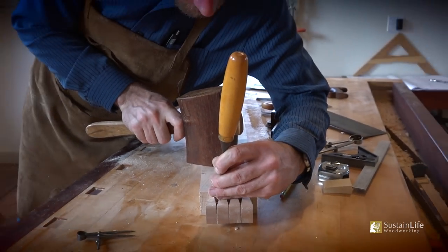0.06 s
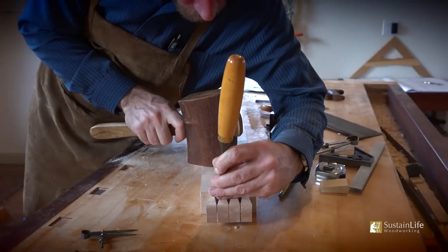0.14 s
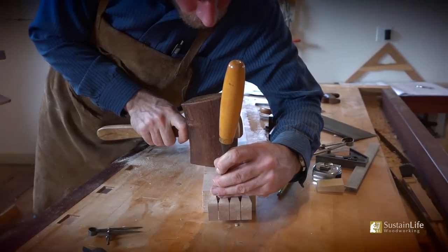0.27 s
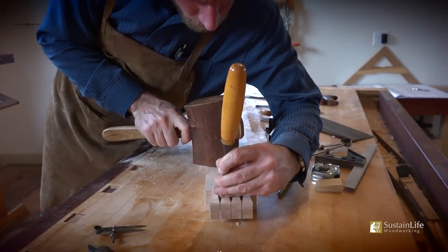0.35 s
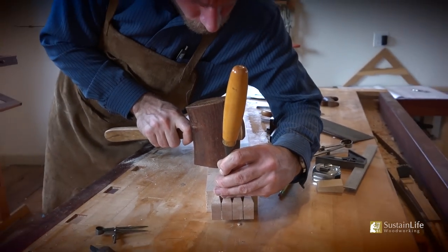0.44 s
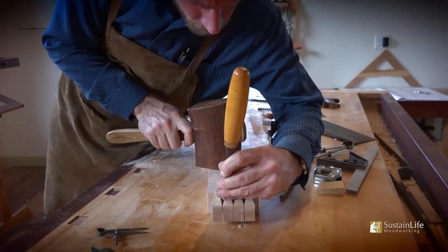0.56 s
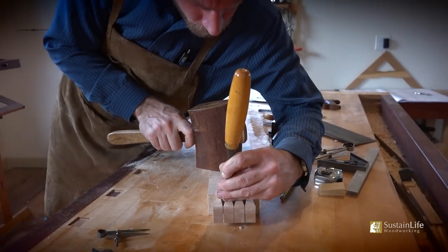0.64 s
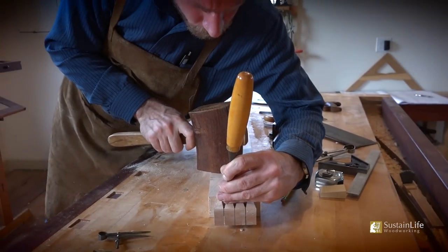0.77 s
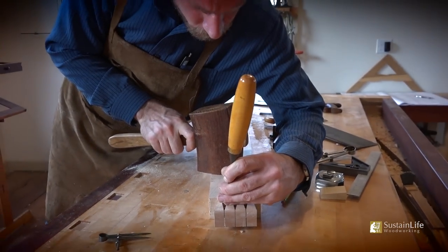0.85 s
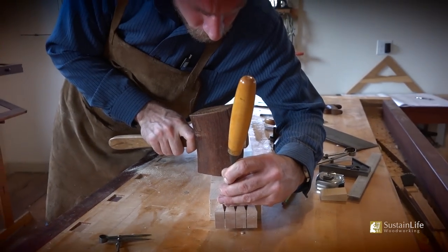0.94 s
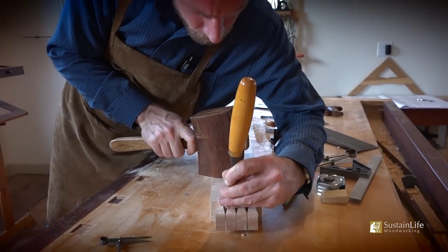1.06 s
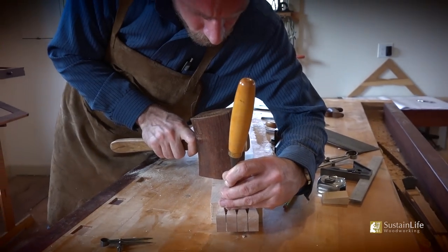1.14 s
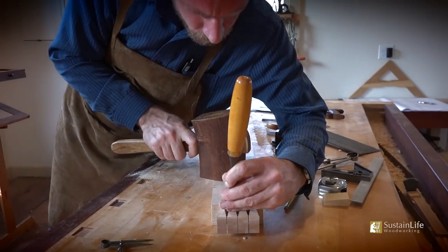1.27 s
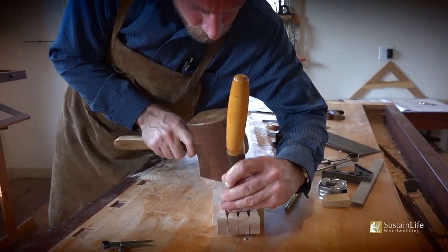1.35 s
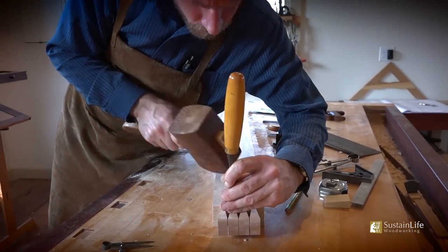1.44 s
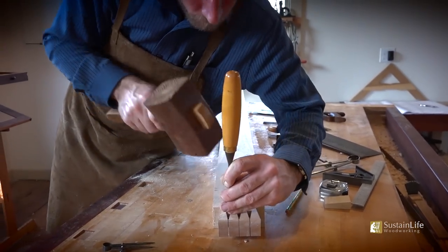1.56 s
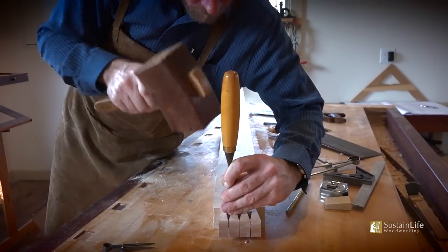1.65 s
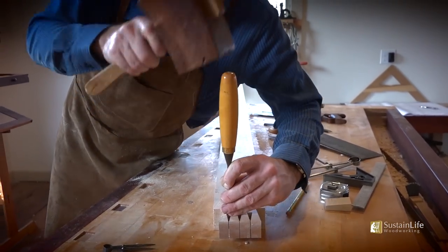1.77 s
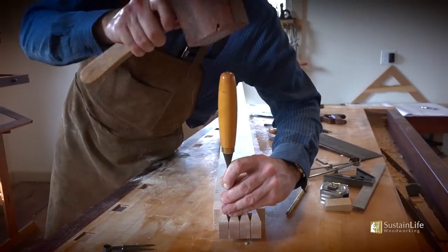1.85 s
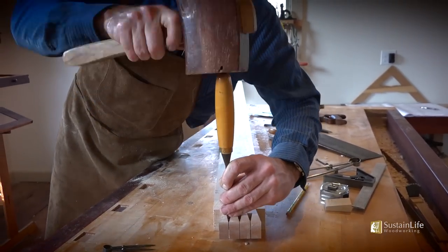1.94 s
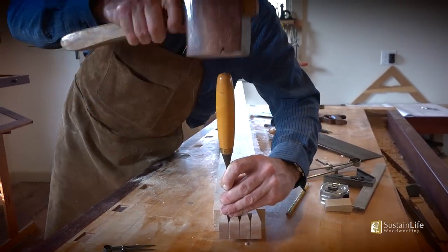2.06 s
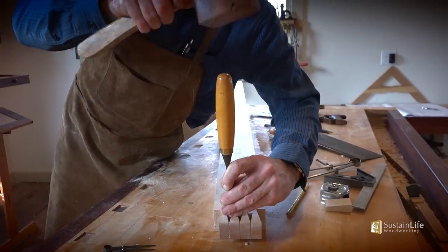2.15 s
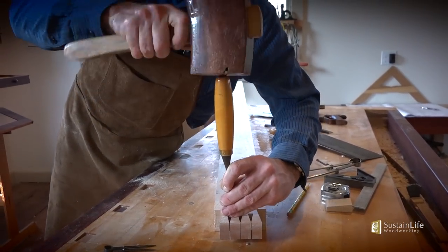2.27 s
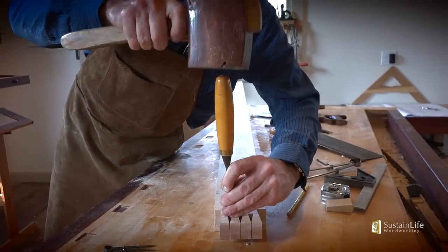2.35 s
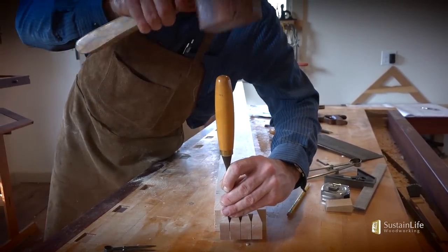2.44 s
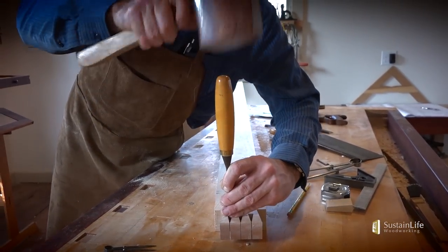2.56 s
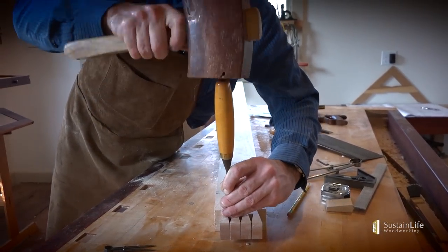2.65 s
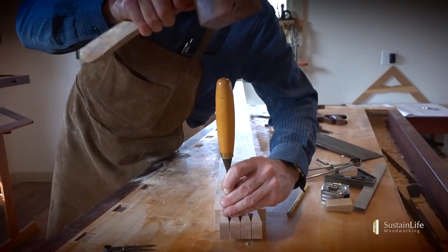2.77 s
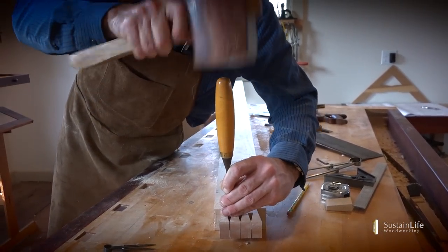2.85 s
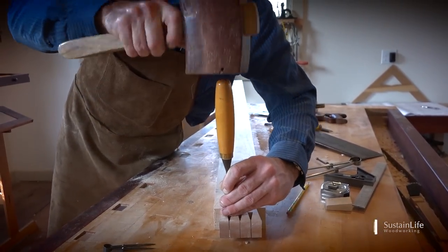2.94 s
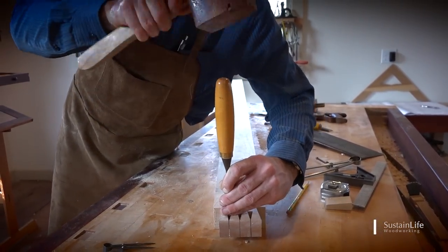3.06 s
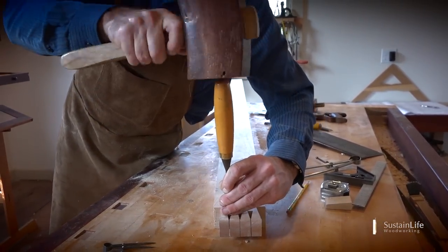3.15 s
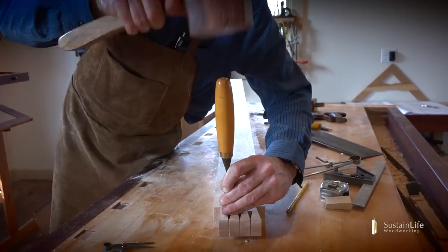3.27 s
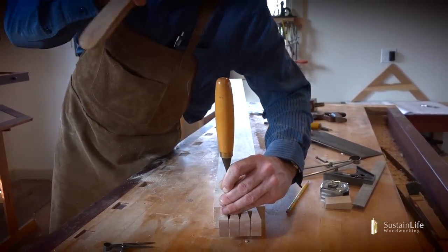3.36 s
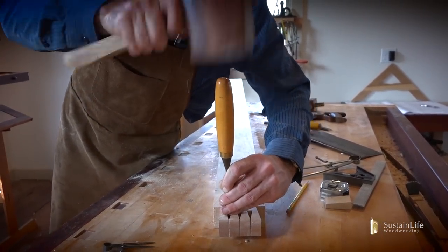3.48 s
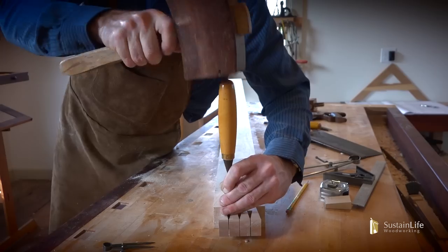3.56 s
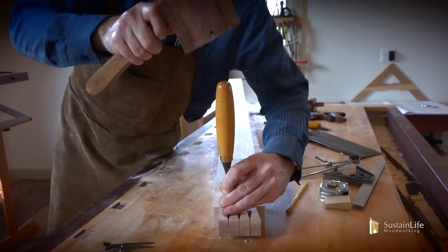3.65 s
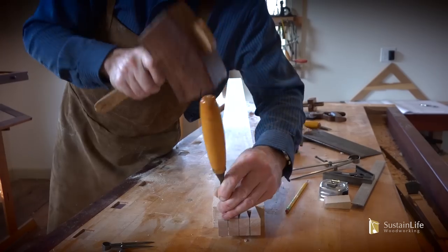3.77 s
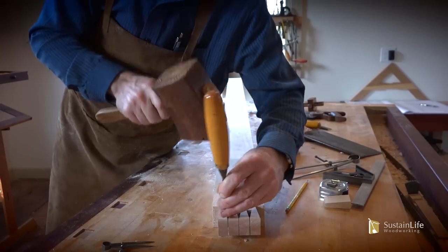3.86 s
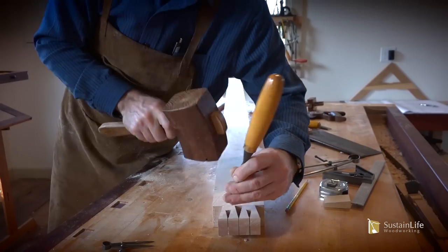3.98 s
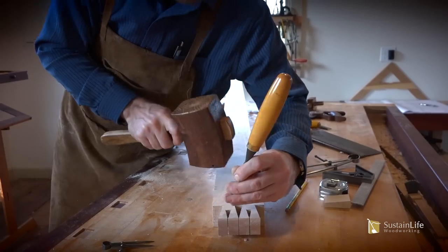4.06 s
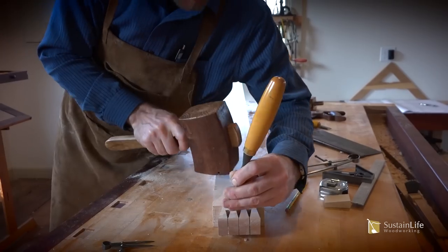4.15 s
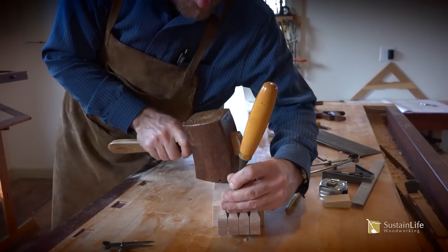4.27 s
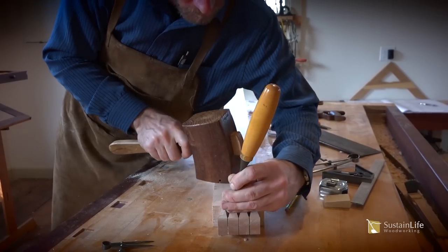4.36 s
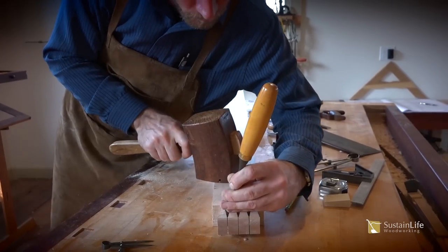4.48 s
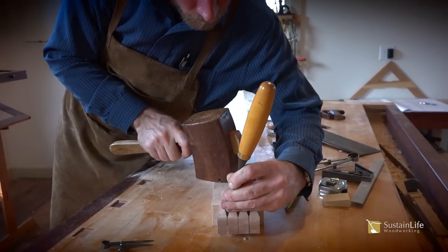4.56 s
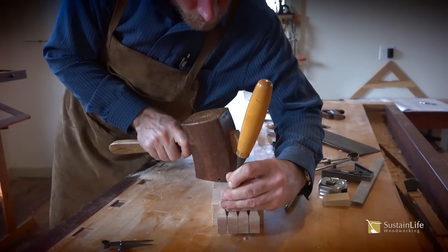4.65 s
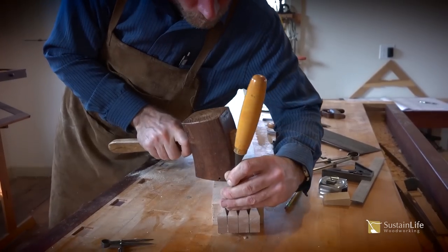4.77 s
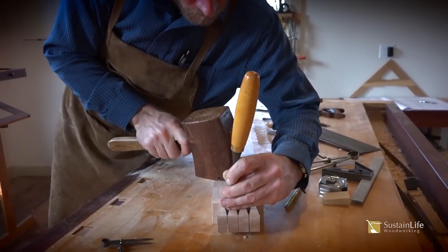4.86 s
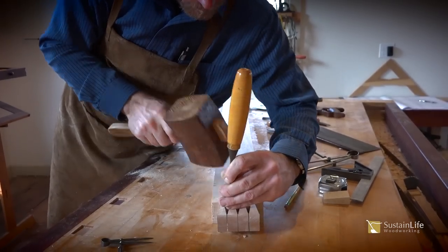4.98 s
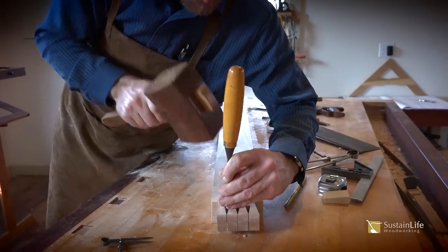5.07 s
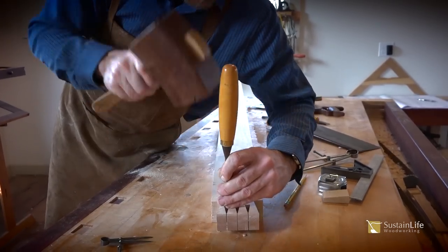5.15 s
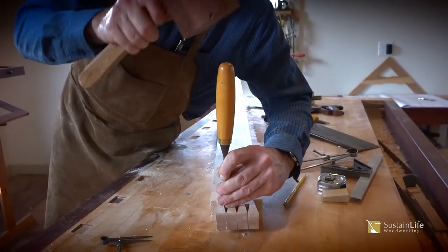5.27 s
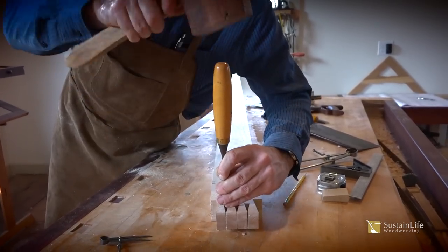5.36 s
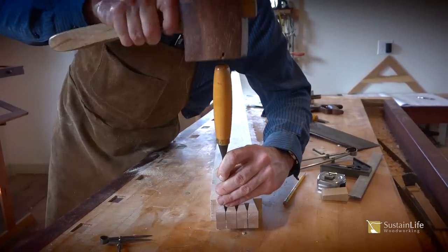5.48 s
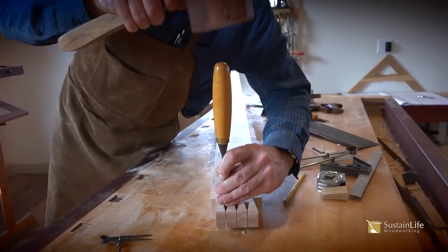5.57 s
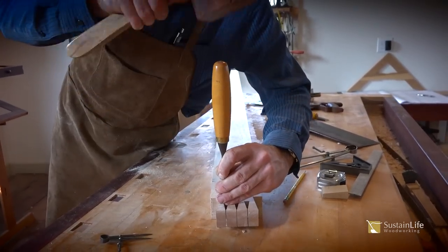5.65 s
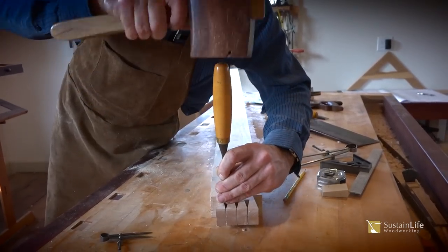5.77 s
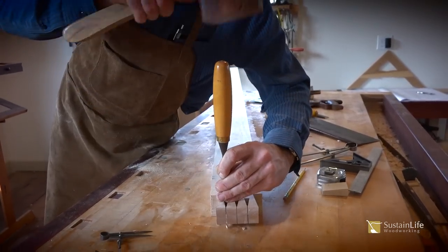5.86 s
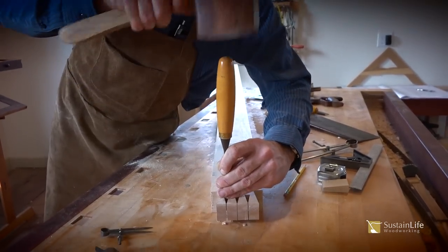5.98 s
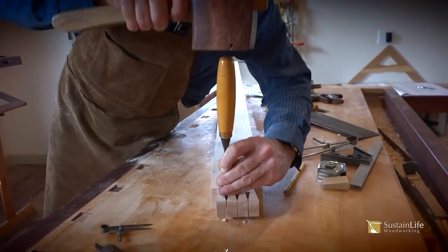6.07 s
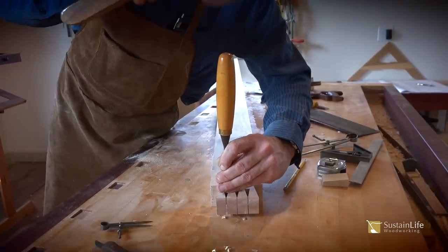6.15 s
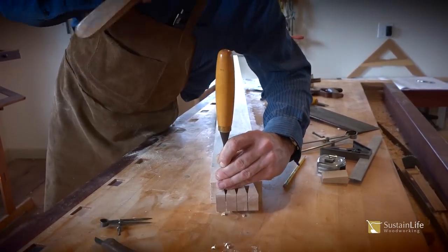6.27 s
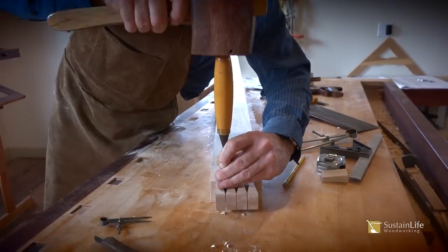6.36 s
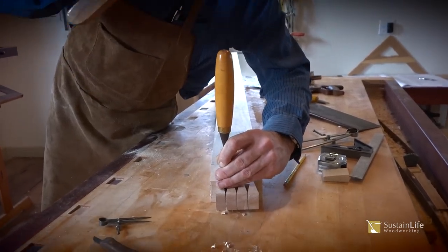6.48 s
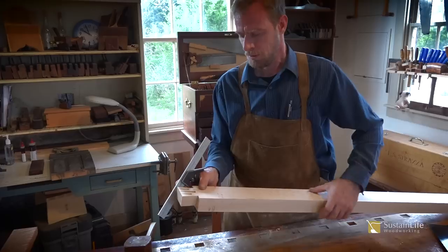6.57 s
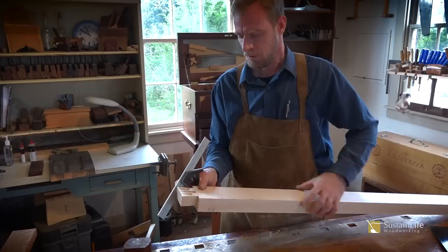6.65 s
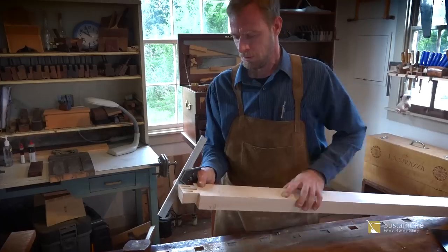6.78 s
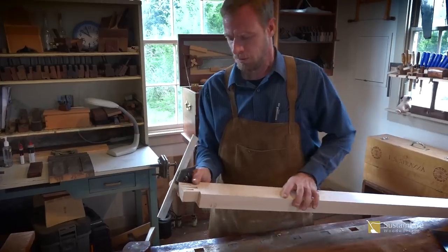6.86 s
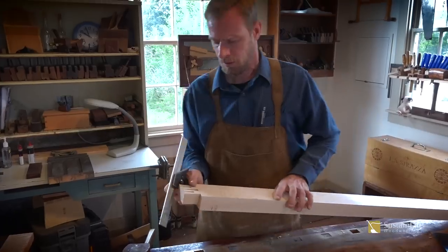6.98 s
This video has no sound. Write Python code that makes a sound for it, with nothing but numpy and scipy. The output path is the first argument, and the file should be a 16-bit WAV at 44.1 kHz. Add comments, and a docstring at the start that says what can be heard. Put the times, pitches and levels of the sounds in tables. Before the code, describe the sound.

A songbird whistles three quick phrases outside, then a wooden mallet knocks a chisel into a board in two runs, cutting abruptly to quiet room tone.

```python
"""Mallet and chisel on a bench

A wooden mallet drives a chisel into a board in two cuts, in a live workshop; between them it is set down.
Each blow is filtered noise and damped modes: harder is brighter, and the bench sways less as the edge sinks in.
A songbird outside, of gliding sines, gives one phrase three times before the work; a hum and air noise lie below.
Gain control flattens the blows and lets the room tone creep back; an edit cuts the last blow short and
opens on quiet room tone with a soft bump of wood."""
import sys
import numpy as np
from scipy import signal
from scipy.fft import rfft, irfft
from scipy.io import wavfile
from scipy.ndimage import uniform_filter1d, minimum_filter1d

SR = 44100
rng = np.random.default_rng(int(sys.argv[2]) if len(sys.argv) > 2 else 0)


def inscribe(sig):
    """Save sig as 16-bit PCM at rate SR to the path in sys.argv[1].

    A 1-D sig is mono; a 2-D sig holds one channel per row.
    Samples are clipped to [-1, 1] before scaling.
    """
    pcm = np.round(np.clip(np.atleast_2d(sig).T, -1, 1) * 32767)
    wavfile.write(sys.argv[1], SR, pcm.astype(np.int16))


N = 309582
TIME_S = np.arange(N) / SR
RING_S = np.arange(SR) / SR
BINS_HZ = np.fft.rfftfreq(8192, 1 / SR)
EDIT_S = 6.595


def amp(db):
    """Decibels to gain."""
    return 10 ** (np.asarray(db) / 20)


def read(points, hz):
    """Table of (f/Hz, value), interpolated on a log-frequency axis."""
    f_hz, value = np.transpose(points)
    return np.interp(np.log(hz + 1), np.log(f_hz + 1), value)


def hump(centre_hz, octaves, hz):
    """Bell of height 1 on a log-frequency axis."""
    return np.exp(-.5 * (np.log2((hz + 1) / centre_hz) / octaves) ** 2)


def lifted(peaks):
    """Gain/dB at BINS_HZ of resonances (f/Hz, half-width/Hz, level/dB)."""
    return sum(db / (1 + ((BINS_HZ - hz) / width_hz) ** 2) for hz, width_hz, db in peaks)


def add(mix, s, sound):
    """Mixes a sound in at time s, trimming what falls outside."""
    start = round(s * SR)
    sound = sound[..., max(-start, 0):]
    part = mix[..., max(start, 0):][..., :sound.shape[-1]]
    part += sound[..., :part.shape[-1]]


def colour(x, gain_db):
    """Minimum-phase filter with the given gain at BINS_HZ, by folding the cepstrum."""
    cepstrum = irfft(np.log(amp(np.maximum(gain_db, -100))))
    half = len(cepstrum) // 2
    cepstrum[1:half] *= 2
    cepstrum[half + 1:] = 0
    taps = irfft(np.exp(rfft(cepstrum)))[:half]
    taps = taps.reshape((1,) * (x.ndim - 1) + (-1,))
    return signal.fftconvolve(x, taps, axes=-1)[..., :x.shape[-1]]


def spread(pair, width):
    """Two unrelated signals, as mid and side, become left and right."""
    side = colour(pair[1], read(width, BINS_HZ))
    return np.array([pair[0] + side, pair[0] - side])


# workshop reverberation: f/Hz, t60/s, build-up time/s
ROOM = [(60, 0.94, 0.00384), (160, 0.66, .004), (414, 0.49, 0.0042), (1080, 0.53, 0.013),
        (2900, 0.53, 0.011), (7910, 0.42, 0.022), (15230, 0.3, 0.015)]
# stereo width of the reverberation: f/Hz, side re mid/dB
ROOM_WIDTH = [(60, -0.5), (110, 0), (200, -16.5), (380, -19), (700, -19), (1290, -20.5), (2380, -24),
              (4400, -32.5), (8120, 3.5), (15000, -14.5)]


def room_tail():
    """Dense reflections: each band of noise gathers and dies at its own speed, treble gathering slowest."""
    hz, t, bands = signal.stft(rng.standard_normal((2, SR)), SR, nperseg=256)
    t60_s = read([(f, decay) for f, decay, _ in ROOM], hz)[:, None]
    build_s = read([(f, build) for f, _, build in ROOM], hz)[:, None]
    envelope = (1 - np.exp(-t / build_s)) * amp(-60 * t / t60_s)
    tail = signal.istft(bands * envelope, SR, nperseg=256)[1][:, :SR]
    return spread(tail, ROOM_WIDTH)


# room tone before the edit, relative spectrum: f/Hz, level/dB
AIR = [(15, -57), (25, -11.5), (61, -4.5), (99, -2), (164, -0.5), (246, -4.5), (274, -10), (552, -10.5),
       (666, -14), (1080, -12.5), (1450, -17.5), (2060, -20.5), (2230, -23), (4750, -27.5), (15500, -34)]
# room tone after the edit, relative spectrum: f/Hz, level/dB
LATE_AIR = [(15, -39), (25, -13.5), (86, -3.5), (129, -11.5), (169, -3), (359, -23.5), (399, -19),
            (457, -11.5), (552, -20), (722, -17), (826, -25.5), (1050, -16), (15500, -39.5)]
# room resonances in the air noise: f/Hz, half-width/Hz, level/dB
AIR_PEAKS = [(78.3, 4.4, 8.5), (175, 6.5, 6), (254.6, 7.2, 12), (1049, 22, 8.5)]
# stereo width of the air noise: f/Hz, side re mid/dB
AIR_WIDTH = [(60, -22.5), (110, -13), (200, -16.5), (380, -7), (700, -11.5), (1290, -14), (2380, -21.5),
             (4400, -17), (8120, 1), (15000, -9.5)]
AIR_DB, LATE_AIR_DB = -50.5, -45  # overall RMS


def room_tone(spectrum, level_db):
    """Steady air noise, lifted at a few resonances of the room."""
    noise = spread(rng.standard_normal((2, N + SR)), AIR_WIDTH)
    air = colour(noise, read(spectrum, BINS_HZ) + lifted(AIR_PEAKS))[:, SR:]  # drop filter run-in
    return amp(level_db) * air / air.std()


# faint hum: t/s, level/dB
HUM = [(0, -63.5), (2, -67.5), (4.2, -54.5), (5.1, -53), (6.59, -55)]
HUM_HZ = 425


def hum(waver=.3, drift_hz=1.5):
    """Faint sine whose level and pitch wander slowly at random."""
    knots_s = np.linspace(0, TIME_S[-1], 60)
    swell = np.interp(TIME_S, knots_s, rng.standard_normal(len(knots_s)))
    drift = np.interp(TIME_S, knots_s, rng.standard_normal(len(knots_s)))
    level = amp(np.interp(TIME_S, *np.transpose(HUM))) * (1 + waver * swell)
    return np.sqrt(2) * level * np.sin(2 * np.pi * np.cumsum(HUM_HZ + drift_hz * drift) / SR)


GLIDE_EASE, NOTE_SWELL = 2.58, 0.66  # exponents: fast-then-settling slide, sine-arch level
BURR_ABOVE_HZ, BURR_HZ = 3000, 129


def note(length_s, first_hz, last_hz, db, burr=0):
    """Sine that swells and fades while sliding onto its last pitch; a burr shakes the highest pitches."""
    t = np.arange(0, length_s, 1 / SR)
    pitch_hz = last_hz + (first_hz - last_hz) * (1 - t / length_s) ** GLIDE_EASE
    pitch_hz += burr * np.maximum(pitch_hz - BURR_ABOVE_HZ, 0) * np.sin(2 * np.pi * BURR_HZ * t)
    swell = abs(np.sin(np.pi * t / length_s)) ** NOTE_SWELL
    return np.sqrt(2) * amp(db) * swell * np.sin(2 * np.pi * np.cumsum(pitch_hz) / SR)


# thin high whistle in the pause: t/s, length/s, first f/Hz, last f/Hz, level/dB
WHISTLE = [(5.0, .07, 8800, 9100, -74), (5.07, .08, 8900, 8200, -72), (5.15, .1, 8500, 9300, -74.5)]


def thin_whistle():
    """Gliding sines, end to end."""
    out = np.zeros(N)
    for s, *shape in WHISTLE:
        add(out, s, note(*shape))
    return out


# notes of the phrase: t into phrase/s, length/s, first f/Hz, last f/Hz, relative level/dB
PHRASE = [(0, .04, 6500, 5290, -8), (.038, .027, 4170, 4080, -2.5), (.058, .027, 3900, 3040, -2),
          (.088, .035, 3800, 4670, -1.5), (0.147, 0.041, 3086, 2980, 6), (.198, 0.025, 2900, 2672, 2.5),
          (.243, .05, 3070, 3590, 0), (0.313, .06, 2710, 2080, 2.5), (0.366, 0.147, 2090, 2025, -4)]
# phrases: t/s, level/dB, pitch factor
SONG = [(-.135, -48.5, 1), (0.369, -45.5, 1), (0.874, -46, 1)]


def bird(direct_db=-3.5, echo_db=-4.0, burr=0.1):
    """Pure whistle heard from outdoors, smeared by its echoes."""
    song = np.zeros(N)
    for s, db, pitch in SONG:
        for after_s, length_s, first_hz, last_hz, note_db in PHRASE:
            add(song, s + after_s, note(length_s, first_hz * pitch, last_hz * pitch, db + note_db, burr))
    tail = room_tail()
    echo = signal.fftconvolve(song[None], tail / np.linalg.norm(tail[0]), axes=1)[:, :N]
    return amp(direct_db) * song + amp(echo_db) * echo


def sleeve(at_s=1.63, length_s=0.11, level_db=-65, centre_hz=5000, octaves=0.78):
    """Cloth swishes as the mallet is raised: band noise under a bell envelope."""
    noise = spread(rng.standard_normal((2, N)), AIR_WIDTH)
    swish = colour(noise, 20 * (hump(centre_hz, octaves, BINS_HZ) - 1))
    envelope = np.exp(-.5 * ((TIME_S - at_s) / length_s) ** 2)
    return amp(level_db) * swish / swish.std() * envelope


# chisel being set and shifted: t/s, gain/dB, centre f/Hz, width/octaves
TICKS = [(.508, -31, 2370, 1.9), (.900, -28.5, 2250, 1.9), (1.514, -36, 4900, 1.05),
         (4.447, -53.5, 5040, .8), (4.517, -38, 6600, .4)]
# board bumping on the bench: t/s, gain/dB, centre f/Hz, width/octaves
BUMPS = [(6.708, -8.5, 120, 2.7), (6.766, -15, 95, 3.4)]
# chips splitting off just after a blow: t/s, gain/dB, centre f/Hz, width/octaves
SPLITS = [(2.372, -12.5, 4000, 2.0), (2.388, -6.5, 4195, 2.3)]


def touches(rows, t60_s, room_db):
    """Light contacts: a decaying noise burst in one broad band, with the room behind it."""
    out = np.zeros((2, N))
    for s, db, hz, octaves in rows:
        burst = rng.standard_normal(SR) * amp(-60 * RING_S / t60_s) + amp(room_db) * room_tail()
        band_db = 55 * (hump(hz, octaves, BINS_HZ) - 1)
        add(out, s, amp(db) * colour(burst, band_db))
    return out


# bench, board and room modes: f/Hz, level/dB, t60/s
BENCH_MODES = [(53.5, -35, 0.56), (77.3, -22.5, 0.48), (90.8, -24.5, 0.47), (122.3, -28, 0.57),
               (164.2, -29.5, .6), (180.4, -23.5, 0.69), (194.8, -26, 0.45), (258.4, -15.5, 0.27),
               (273.7, -22, 0.6), (316, -23, 0.22), (385, -52, 2), (402, -29, 0.16), (482.6, -20.5, 0.37),
               (538, -35, 0.86), (589.5, -19.5, 0.24), (708, -18, 0.28), (877, -28, 0.31),
               (926, -24.5, 0.54), (944, -29.5, .42), (1124, -25.5, 0.23), (1502, -25.5, 0.49),
               (1613, -26, 0.44), (1857, -27, 0.54), (2280, -26.5, 0.39)]
# dense, unresolved part of the ring: f/Hz, gain/dB
WOOD = [(30, -46.5), (60, -21.5), (140, -15), (220, -6), (450, -0.5), (900, -2), (1500, -3), (2500, -5),
        (4500, -1), (7000, -1), (10000, -0.5), (13000, 7.5), (16000, 6)]


def bench_ring(shared_tail, snap_db, push_db=23.5, clatter_db=6, clatter_t60_s=0.14, clatter_hz=600,
               room_db=1, swell_s=0.0034, same=0.57):
    """Answer to a unit blow: direct push, short dull clatter of wood, modes and room."""
    same = np.clip(same, 0, 1)  # power share of the tail passed in
    dense = amp(room_db) * (np.sqrt(same) * shared_tail + np.sqrt(1 - same) * room_tail())
    clatter = amp(clatter_db + snap_db - 60 * RING_S / clatter_t60_s) * rng.standard_normal(SR)
    dense += colour(clatter, -10 * np.log10(1 + (BINS_HZ / clatter_hz) ** 2))
    dense[:, 0] -= amp(push_db + snap_db)  # the push: one impulse
    modes = np.zeros(SR)
    for hz, db, t60_s in BENCH_MODES:
        phase = 2 * np.pi * (hz * RING_S + rng.random())
        modes += amp(db - 60 * RING_S / t60_s) * np.sin(phase)
    return colour(dense, read(WOOD, BINS_HZ)) + modes * (1 - np.exp(-RING_S / swell_s))


# mallet set down between the cuts: t/s, force/dB
SET_DOWN = (4.3335, -1.7)
# colour of the landing: f/Hz, gain/dB
LANDING = [(45, -18), (85, 3), (190, 0), (300, 3), (390, -2), (520, -9.5), (800, -14.5), (1600, -15.5),
           (1950, -31.5), (2850, -29), (3600, -45.5), (12000, -66)]


def set_down(snap_db=4.5):
    """The mallet's head lands on the bench: a slow, dull contact."""
    out = np.zeros((2, N))
    s, force_db = SET_DOWN
    landing = colour(bench_ring(room_tail(), snap_db), read(LANDING, BINS_HZ))
    add(out, s, amp(force_db) * landing)
    return out


def contact(corner_hz, slope_db=18):
    """Contact time low-passes a blow: gain/dB at BINS_HZ."""
    return -slope_db / 6 * np.log2(1 + (BINS_HZ / corner_hz) ** 6)


def grip():
    """Grip and point of impact differ per blow, favouring other upper resonances: gain/dB at BINS_HZ."""
    knots_hz = np.geomspace(900, 16000, 70)
    return np.interp(BINS_HZ, knots_hz, 1.6 * rng.standard_normal(len(knots_hz)), left=0)


def depths():
    """Edge sinks in proportion to force: share of its cut done after each blow."""
    s, force_db = np.transpose(BLOWS)[:2]
    cuts = amp(force_db[s < SET_DOWN[0]]), amp(force_db[s > SET_DOWN[0]])
    return np.concatenate([np.cumsum(cut) / cut.sum() for cut in cuts])


CONTACT_HZ, CONTACT_OCTAVES_PER_DB = 1473, 0.0457  # harder blow, shorter contact, higher corner
SWAY_DB, SWAY_LOSS_DB, SWAY_CURVE = 4, 14, 1.7  # bench sway, lost with depth
# damped resonances of the hand-held chisel: f/Hz, half-width/Hz, level/dB
CHISEL = [(2540, 25, 2), (3720, 77, 0), (5420, 100, 4), (6280, 120, 7.5), (6990, 110, 6.5),
          (8090, 350, 7.5), (9400, 150, 5.5), (12200, 500, 6.5)]
# blows: t/s, force/dB, board thud/dB, mallet knock/dB, fibre crunch f/Hz, crunch/dB,
# crack f/Hz, crack/dB, steel brightness/dB
BLOWS = [ (2.0254, 5.5, 7.5, -1.5, 417, 4, 1750, -0.5, -1.5),
         (2.3560, 12.5, -4.5, 5, 1200, 7, 2890, 7.5, 2), (2.6782, 11, -4.5, -3.5, 2030, 3.5, 3000, 5.5, 2),
         (2.9585, 11, 8, 4.5, 1630, 3.5, 3360, 4.5, 0), (3.2287, 18, 1.5, 2.5, 2050, 6.5, 4500, 8.5, -4),
         (3.5845, 14.5, -0.5, 0.5, 1920, 5, 4150, 6.5, -1), (5.511, -7, 0, 4.5, 700, 0.5, 2550, 8, 14),
         (5.8045, -0.5, -1.5, -6, 520, -1.5, 2860, 8, 4), (6.0930, 5.5, -4, 5.5, 2320, 3.5, 3800, 2.5, 5.5),
         (6.4167, 9, -4, 2.5, 1500, 2, 3450, 5.5, -1)]


def mallet(snap_per_db=0.26, snap_from_db=7.0, crunch_octaves=0.28, crack_octaves=0.17,
           tick_db=-33.0, tick_t60_s=0.027, tick_hz=6800, tick_octaves=0.89):
    """Force sets brightness, depth the bench sway; how the edge bites decides what rings most."""
    out, shared_tail = np.zeros((2, N)), room_tail()
    for blow, depth in zip(BLOWS, depths()):
        s, force_db, thud_db, knock_db, crunch_hz, crunch_db, crack_hz, crack_db, bright_db = blow
        sway_db = SWAY_DB - SWAY_LOSS_DB * depth ** SWAY_CURVE
        contact_db = contact(CONTACT_HZ * 2 ** (CONTACT_OCTAVES_PER_DB * force_db))
        bite_db = read([(35, 0), (75, sway_db), (125, thud_db), (185, thud_db), (265, knock_db),
                        (380, 0), (2000, 0.001), (5000, bright_db)], BINS_HZ)
        bite_db += crunch_db * hump(crunch_hz, crunch_octaves, BINS_HZ)
        bite_db += crack_db * hump(crack_hz, crack_octaves, BINS_HZ)
        chisel_db = lifted(CHISEL) + grip()
        # light blows start with a sharper push and clatter; in hard blows the ring stands out more
        snap_db = snap_per_db * (snap_from_db - force_db)
        wood = colour(bench_ring(shared_tail, snap_db), contact_db + bite_db + chisel_db)
        # very short bright tick of the steel blade
        tick = spread(rng.standard_normal((2, SR)), ROOM_WIDTH)
        tick = tick * amp(tick_db + bright_db - 60 * RING_S / tick_t60_s)
        steel = colour(tick, 20 * (hump(tick_hz, tick_octaves, BINS_HZ) - 1) + chisel_db)
        add(out, s, amp(force_db) * (wood + steel))
    return out


def scene():
    """The chopping, then after the edit the same shop, quiet."""
    background = room_tone(AIR, AIR_DB) + hum() + thin_whistle() + bird()
    handling = sleeve() + touches(TICKS, t60_s=0.017, room_db=-61) + set_down()
    chopping = background + handling + touches(SPLITS, t60_s=0.046, room_db=-26) + mallet()
    afterwards = room_tone(LATE_AIR, LATE_AIR_DB) + touches(BUMPS, t60_s=0.12, room_db=-16.5)
    return np.where(TIME_S < EDIT_S, chopping, afterwards)


def held(over_db, db_per_s):
    """Jumps up with each peak, then sinks at a steady rate."""
    fall_db = TIME_S * db_per_s
    return np.maximum.accumulate(over_db + fall_db) - fall_db


def record(dry, ceiling_db=-4.5, quick_db_per_s=115, slow_db_per_s=4.5, slow_share=0.57,
           round_level=.58, band_edge_hz=15950):
    """Gain control with quick and slow recovery, released at the edit; rounded peaks; band limit."""
    peak = -minimum_filter1d(-abs(dry).max(0), size=45)
    over_db = np.maximum(20 * np.log10(peak + 1e-9) - ceiling_db, 0)
    duck_db = np.maximum(held(over_db, quick_db_per_s), held(slow_share * over_db, slow_db_per_s))
    ducked = dry * amp(-uniform_filter1d(duck_db, size=45) * (TIME_S < EDIT_S))
    rounded = ducked / (1 + (ducked / round_level) ** 8) ** (1 / 8)
    low_pass = signal.firwin(511, band_edge_hz, window=("kaiser", 9), fs=SR)
    return signal.oaconvolve(rounded, low_pass[None], "same")


dry = scene()
out = record(dry)
inscribe(out)
```